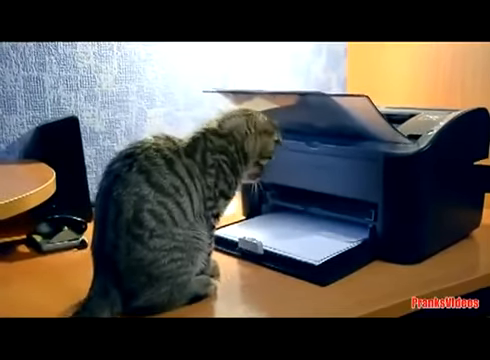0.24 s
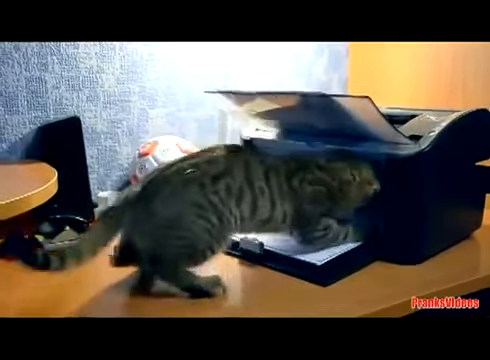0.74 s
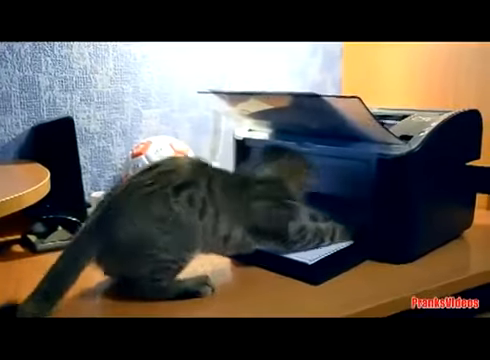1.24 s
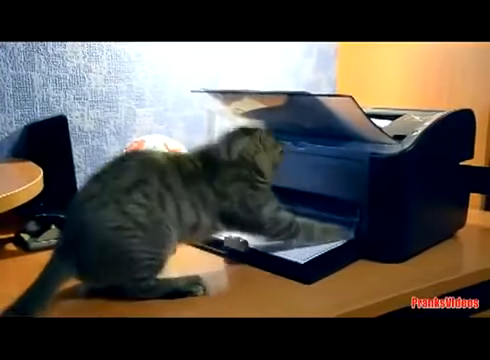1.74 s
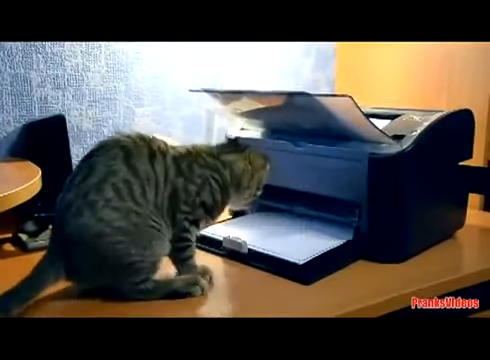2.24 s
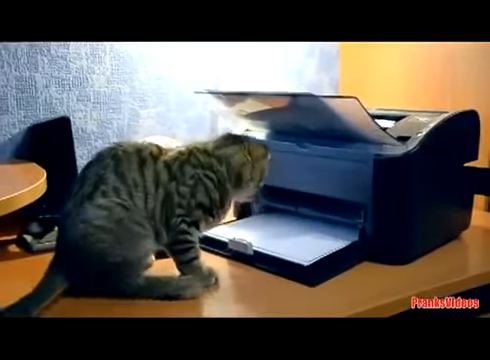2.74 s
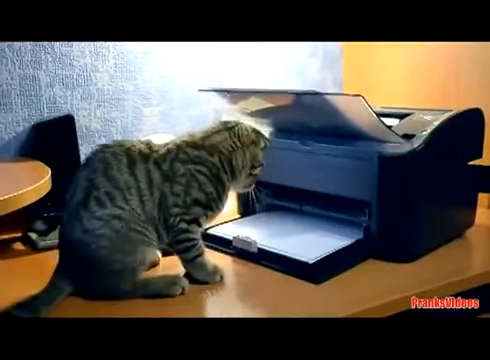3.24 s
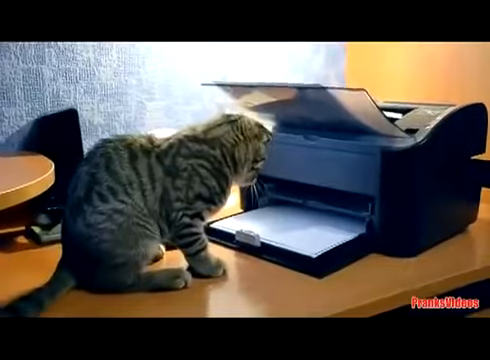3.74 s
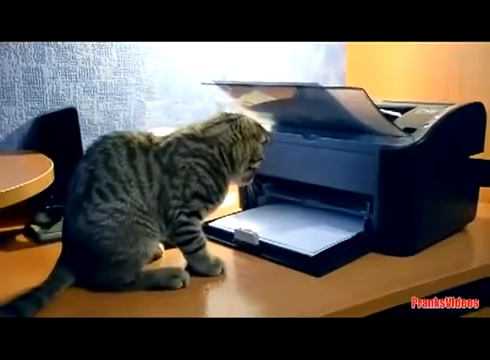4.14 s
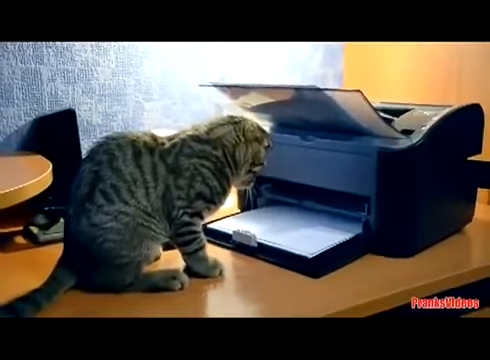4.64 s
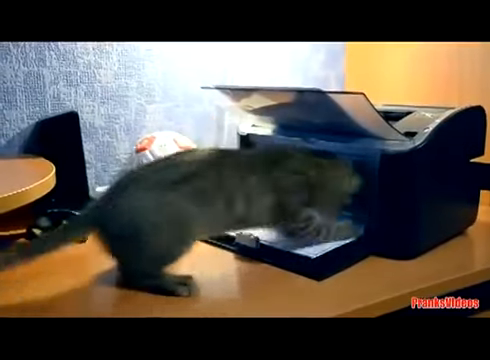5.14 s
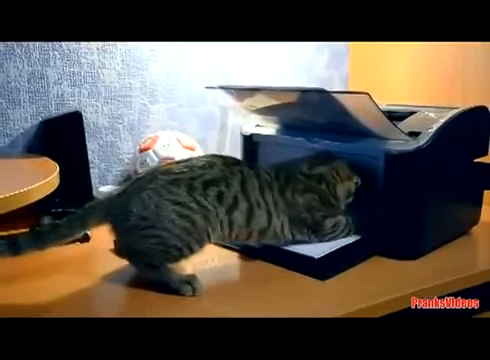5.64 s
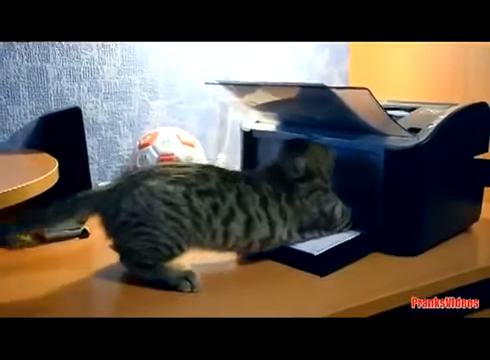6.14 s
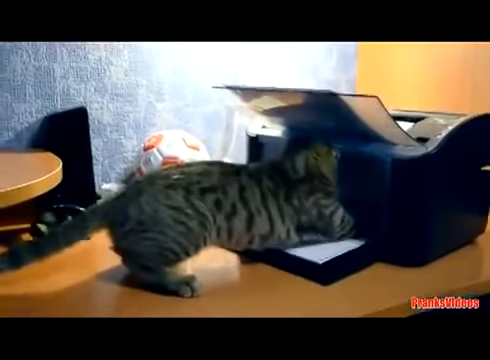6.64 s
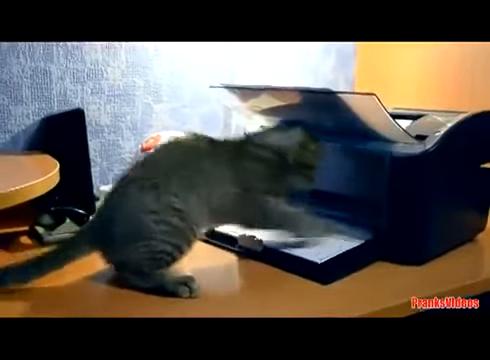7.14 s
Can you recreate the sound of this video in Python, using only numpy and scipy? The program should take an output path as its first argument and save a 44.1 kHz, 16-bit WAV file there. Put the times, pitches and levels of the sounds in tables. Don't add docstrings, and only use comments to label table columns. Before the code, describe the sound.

A small desktop printer hums and whirs steadily while irregular plastic clacks, paw thumps and sharp claw snaps rattle its tray in a furnished room.

```python
import sys
import numpy as np
from scipy import signal
from scipy.fft import rfft, irfft
from scipy.io import wavfile
from scipy.ndimage import uniform_filter1d

SR = 44100
rng = np.random.default_rng(int(sys.argv[2]) if len(sys.argv) > 2 else 0)


def transcribe(signal):
    frames = np.atleast_2d(signal).T
    limited = np.clip(frames, -1, 1)
    pcm = np.round(limited * 32767).astype(np.int16)
    wavfile.write(sys.argv[1], SR, pcm)


def boost(x):
    u = np.asarray(x, float) / 20
    return 10 ** u


N = 325458


def rms_one(x):
    return x / np.sqrt(np.mean(x ** 2) + 1e-20)


def in_time(rows):
    times, *columns = np.transpose(rows)
    return [np.interp(np.arange(N) / SR, times, column) for column in columns]


def at_hz(points, hz):
    point_hz, point_db = np.array(points)[:, :2].T
    return np.interp(np.log(hz), np.log(point_hz), point_db)


def drift(rate_hz):
    hop = 40
    r = np.exp(-2 * np.pi * hop * rate_hz / SR)
    slow = signal.lfilter([1], [1, -2 * r, r * r], rng.standard_normal(N // hop + 2002))[2000:]
    return np.interp(np.arange(N) / hop, np.arange(len(slow)), rms_one(slow))


def resonance(x, hz, width):
    r = np.exp(-np.pi * width / SR)
    poles = [1, -2 * r * np.cos(2 * np.pi * hz / SR), r * r]
    return signal.lfilter(np.array([1, 0, -1]) * (1 - r * r) / 2, poles, x)


def coloured_noise(spectrum, patchy_db, grain_db):
    hz = np.maximum(np.fft.rfftfreq(N, 1 / SR), 1)
    grains = rng.standard_normal(N) * boost(grain_db * rng.exponential(1, N))
    shaped = rfft(grains) * boost(at_hz(spectrum, hz))
    out = 0
    for octave in range(4, 15):
        share = np.clip(1 - np.abs(np.log2(hz) - octave), 0, 1)
        out = out + irfft(shaped * share, N) * boost(patchy_db * drift(19.4))
    return rms_one(out)


def room(x):
    t60_s, level_db, wall_cut_hz = 0.28, -4.5, 2600
    t = np.arange(SR // 3) / SR
    white = rng.standard_normal(len(t))
    dull = signal.sosfilt(signal.butter(1, wall_cut_hz, fs=SR, output="sos"), white)
    tail = dull * boost(-60 * t / t60_s) + (white - dull) * boost(-90 * t / t60_s)
    tail *= np.clip(t / 0.0041, 0, 1)
    wet = boost(level_db) * signal.fftconvolve(x, tail / np.sqrt(np.sum(tail ** 2)))
    return wet + np.pad(x, (0, len(t) - 1))


# (frequency [Hz], level per Hz [dB])
DRIVE_COLOUR = [(15, -81), (25, -60), (70, -58), (95, -43), (125, -20), (250, -14), (400, -11.5),
                (620, -10.5), (1000, -9.5), (1900, -8), (3000, -17.5), (5000, -36), (8000, -68)]
# (frequency [Hz], level per Hz [dB])
PAPER_COLOUR = [(1500, -27), (2500, -2), (3200, -4.5), (4000, -7), (5400, -9), (7000, -9), (9000, -11),
                (10300, -22.5), (11500, -18.5)]
# (frequency [Hz], width [Hz], level [dB])
CASE_PANELS = [(132, 23, -67.5), (306.7, 9.5, -65), (400, 4.2, -64.5), (854, 37, -59.5), (1065, 90, -56),
               (2110, 98, -59.5)]
# (time [s], level [dB])
DRIVE_LOAD = [(0, -40.5), (.18, -42), (.35, -46), (.78, -45.5), (.9, -40), (1.15, -43), (1.66, -41),
              (1.95, -44), (2.67, -42), (3.06, -43.5), (4.09, -43), (4.3, -43), (5.1, -42.5), (5.3, -49),
              (5.43, -42), (5.7, -44.5), (6.33, -42), (7.38, -40)]
# (middle time [s], half length [s], rise [dB])
PAPER_SLIDES = [(1.3, 0.27, -0.5), (2.4, 0.67, 2.5), (2.898, 0.26, 5.5), (3.55, 0.59, 3), (4.6, 0.73, 3),
                (5.42, .12, 4), (6.3, .4, 4), (6.913, .1, -0.5), (7.197, 0.31, 4.5), (1.05, 0.092, 4),
                (1.8, .1, -1)]


def running_noise():
    drive_db, = in_time(DRIVE_LOAD)
    t = np.arange(N) / SR
    paper_db = drive_db - 10
    for middle, half, rise_db in PAPER_SLIDES:
        paper_db = paper_db + rise_db * np.clip(1 - np.abs(t - middle) / half, 0, 1)
    drive = boost(drive_db - 4.0) * coloured_noise(DRIVE_COLOUR, patchy_db=2.0, grain_db=0.9)
    paper = boost(paper_db + 1.0) * coloured_noise(PAPER_COLOUR, patchy_db=0.74, grain_db=-2.0)
    panels = 0
    for hz, width, db in CASE_PANELS:
        panels = panels + boost(db) * rms_one(resonance(rng.standard_normal(N), hz, width))
    return drive + paper + panels


# (start time [s], end time [s], third multiple level [dB], sixth multiple level [dB])
CLEAR_PATHS = [(.2, 0.728, -62.5, -61), (.85, 1.5, -77, -69), (1.5, 2.2, -59.5, -65.5),
               (2.205, 3.62, -58, -59), (4.9, 5.35, -57, -58.5), (5.35, 6.05, -66, -69),
               (6.45, 6.8, -63, -63), (7.08, 7.45, -57, -58.5)]


def upper_path(column):
    screened_db, step_aside_s = -80, 0.041
    t = np.arange(N) / SR

    def opening(s):
        return np.clip((t - s) / step_aside_s + .5, 0, 1)

    level_db = screened_db
    for row in CLEAR_PATHS:
        is_open = opening(row[0]) - opening(row[1])
        level_db = level_db + (row[column] - screened_db) * is_open
    return level_db


# (time [s], pitch [Hz], level [dB])
GEAR_RUNS = [
    [(0.0, 502.6, -44), (7.38, 506.8, -43.5)],
]
# (multiple of its pitch [-], level [dB])
GEAR_TONES = [(1, 1), (2, -15.5), (4, -23)]
# (time [s], level [dB])
MIRROR_SECOND_TONE = [(0, -54), (.4, -52), (.75, -56), (1, -59), (1.3, -57.5), (1.9, -62), (2.35, -53),
                      (2.7, -60), (3, -50.5), (3.3, -49), (3.8, -52.5), (4.18, -48.5), (4.5, -52),
                      (5.4, -53.5), (6, -53.5), (7.38, -55)]


def motors():
    hz, level_db = in_time(GEAR_RUNS[0])
    turn = 2 * np.pi * np.cumsum(hz) / SR
    gear = sum(boost(level_db + db + 1.14 * drift(14)) * np.sin(k * turn) for k, db in GEAR_TONES)
    mirror_hz = 612.8
    turn = 2 * np.pi * mirror_hz * np.arange(N) / SR
    levels = [(2, in_time(MIRROR_SECOND_TONE)[0]), (3, upper_path(2)), (6, upper_path(3))]
    mirror = sum(boost(db + 2.0 * drift(27)) * np.sin(k * turn) for k, db in levels)
    return np.sqrt(2) * (gear + mirror)


# (time [s], frequency [Hz], peak level [dB], 60 dB decay time [s])
RINGING_PARTS = [(.103, 2270, -30, 0.16), (.103, 830, -34, 0.14), (1.92, 6350, -30.5, 0.11),
                 (1.92, 9030, -41, 0.19), (2.113, 9100, -57, 0.083), (2.945, 1230, -39, 0.11),
                 (3.441, 5800, -40, .2), (3.441, 1920, -31, 0.16), (3.441, 10000, -44, .12),
                 (3.96, 476, -27, 0.13), (4.085, 6370, -37, 0.079), (4.181, 9300, -45, 0.072),
                 (4.567, 1440, -33, .06), (4.915, 2250, -33, .15), (4.915, 6970, -33, 0.055),
                 (5.045, 2120, -28.5, 0.15), (5.76, 800, -37.5, 0.21), (6.8, 870, -28.5, 0.12),
                 (6.772, 5140, -43, 0.3), (6.796, 5900, -39, 0.13), (6.796, 4500, -37.5, .12),
                 (6.797, 7200, -44, 0.19), (6.801, 151, -42, 0.21), (.74, 3200, -47, 0.18),
                 (.96, 3040, -51, 1.1), (3.952, 2700, -37, .13), (6.346, 4030, -34.5, 0.07),
                 (4.075, 2200, -28, 0.15), (.258, 2090, -30, 0.14), (5.042, 1150, -24, 0.12)]


def rings():
    out, t = np.zeros(N + SR), np.arange(SR // 4) / SR
    swell = 1 - np.exp(-t / 0.0021)
    for s, hz, peak_db, t60 in RINGING_PARTS:
        shaken = rms_one(resonance(rng.standard_normal(len(t)), hz, 40 + 0.01 * hz))
        start = round(s * SR)
        out[start:start + len(t)] += shaken * boost(peak_db - 60 * t / t60) * swell
    return out[:N]


# (time [s], peak level [dB])
CLAW_SNAPS = [
    (.836, -27),
    (1.647, -27.5),
    (4.916, -33),
    (6.738, -27),
    (6.771, -17.5),
    (6.794, -7.5),
    (6.801, -20),
    (6.811, -38),
    (6.83, -29),
]
# (frequency [Hz], width [Hz], level [dB])
TRAY_MODES = [(390, 99, -31), (900, 67, 1), (1480, 570, 15), (2240, 300, 14), (4600, 1400, 5.5),
              (5720, 380, 11.5), (7140, 440, -12)]


def snaps():
    clicks = np.full(N, 1e-18)
    for s, peak_db in CLAW_SNAPS:
        clicks[round(s * SR) + np.arange(2)] = boost(peak_db + 1.5)
    clicks = signal.sosfilt(signal.butter(4, 7600, fs=SR, output="sos"), clicks)
    tray = 0
    for k, (hz, width, db) in enumerate(TRAY_MODES):
        tray = tray + (-1) ** k * boost(db) * resonance(clicks, hz, width)
    return tray


# (time [s], peak level [dB], snap below peak [dB],
# second landing above the first [dB], rattle 60 dB decay time [s])
LEVER_LANDINGS = [(.254, -17, -24, -7.5, .13), (.753, -22.5, -29, -7.5, 0.24), (.812, -29.5, -22, 4, 0.081),
                  (1.916, -18, -13, -2.5, 0.073), (2.942, -22.5, -9.5, -16, .07),
                  (3.299, -31, -13, 1.5, 0.092), (3.948, -16.5, -29, -3.5, 0.099),
                  (4.157, -33, -13.5, 9.5, 0.11), (4.632, -28.5, -15, 0, .12),
                  (5.039, -17.5, -21.5, -5, .155), (5.252, -27.5, -12.5, 6, .2),
                  (6.176, -22.5, -16, 1, 0.055), (6.342, -15, -21.5, -5.5, 0.1),
                  (6.884, -27.5, -16.5, 0, 0.091)]
# (time [s], peak level [dB], snap [dB], second landing [dB], rattle decay time [s])
LIGHT_CATCHES = [
    (3.032, -21.5, -16.5, -4.5, 0.098),
    (4.067, -19, -23, 2, 0.17),
    (4.905, -25.5, -16.5, 0, 0.21),
    (5.46, -26.5, -12.5, -2, 0.24),
]
# (time [s], peak level [dB], thud below peak [dB], snap below peak [dB], rattle decay time [s])
PAW_BLOWS = [(.221, -32, -10, -32, .34), (.279, -26, -9, -19, 0.11), (.735, -19, -13, -3, 0.24),
             (0.998, -35.5, 1, -10, 0.31), (1.916, -24.5, -8, -22, 0.14), (4.743, -25.5, -18.5, -23, 0.076),
             (5.039, -26, -8, -19, .15), (6.069, -35, -14, -17, 0.23), (6.735, -25, -10.5, -28, .12),
             (6.771, -20.5, -12, -22, 0.1), (6.794, -23, -17, -32, .08), (6.816, -27.5, -8, -25, .053)]
# (time [s], peak level [dB], thud below peak [dB], snap below peak [dB], rattle decay time [s])
SMALL_TICKS = [(.1, -24, -27, -14.5, 0.2), (.138, -29.5, -13, -21, 0.15), (.181, -33, -19, 6, 0.038),
               (.789, -29, -18, -10, .25), (1.366, -38, -31, -3, .07), (1.645, -25, -18, -16, 0.09),
               (1.8, -41, -17, 2, 0.16), (2.016, -27, -25, -25, .063), (2.111, -22, -22, -11, 0.032),
               (2.272, -33.5, -20, -19, .1), (3.439, -22.5, -34, -3, 0.087), (3.855, -31, -20, -16, .07),
               (3.995, -22.5, -28, -44, .1), (4.514, -32.5, -33, -21, .16), (4.566, -30.5, -20, -23, 0.44),
               (4.678, -29, -28, -11, 0.1), (5.33, -30, -13, -17.5, 0.36), (5.518, -27, -17, -17, 0.075),
               (5.755, -25, -17, -32, 0.072), (6.149, -30, -19, -18, 0.23),
               (6.245, -25.5, -19.5, -24, 0.03), (6.314, -34, -18, 1, 0.042),
               (6.468, -28.5, -23, -17.5, 0.094)]


def landings():
    thud_db = -22.5
    pairs = [(.02, *row) for row in LEVER_LANDINGS] + [(.012, *row) for row in LIGHT_CATCHES]
    doubles = []
    for gap_s, s, db, snap_db, more_db, t60 in pairs:
        doubles.append((s, db, thud_db, snap_db, t60))
        doubles.append((s + gap_s, db + more_db, thud_db + 2.5, snap_db - 2, 1.2 * t60))
    return doubles + list(PAW_BLOWS) + list(SMALL_TICKS)


# (frequency [Hz], level [dB])
HOUSING_COLOUR = [(120, -9.5), (250, 0), (400, 5), (650, -2.5), (1000, 2.5), (1500, 3.5), (2100, 4),
                  (2700, 2.5), (3400, 1), (4300, 1), (5200, -0.5), (6200, 2.5), (9200, -3.5), (11000, -22)]


def knocks():
    out, t = np.zeros(N + SR), np.arange(SR // 4) / SR
    swell = 1 - np.exp(-t / .0013)
    modes = np.geomspace(130, 10500, 30)
    for s, peak_db, thud_db, snap_db, t60 in landings():
        clack_db = -6 + 0.21 * snap_db

        sizes = rng.standard_normal(len(t)) * boost(2.0 * np.minimum(rng.exponential(1, len(t)), 3.5))
        fall_db = -60 * t / t60
        contacts = sizes * (rng.random(len(t)) < 7000 / SR) * boost(fall_db) * swell
        contacts[SR // 1000] += 1.4
        hard = contacts * boost(0.22 * fall_db)

        pitches = modes * boost(rng.normal(0, .1, len(modes)))
        share_db = np.interp(np.log(pitches), np.log([400, 800, 1300, 2400, 5500, 10000]),
                             [thud_db + 12, 0, 0, clack_db + 8, snap_db + 11.5, 1.16 * snap_db + 14.5])
        uneven_db = rng.normal(0, 1.2, len(modes))
        strength = boost(share_db + at_hz(HOUSING_COLOUR, pitches) + uneven_db)
        widths = 30 + .14 * pitches
        body = 0
        for k, (gain, hz, width) in enumerate(zip(strength, pitches, widths)):
            push = hard if hz > 3500 else contacts
            body = body + (-1) ** k * gain * resonance(push + 1e-18, hz, width) / np.sqrt(width)

        loudest = np.sqrt(uniform_filter1d(body ** 2, size=SR // 100).max())
        heard = room(boost(peak_db - 10) * body / loudest)
        start = round(s * SR)
        out[start:start + len(heard)] += heard
    return out[:N]


def scene():
    hits = knocks() + rings() + room(snaps())[:N]
    thin = signal.sosfilt(signal.butter(2, 110, "high", fs=SR, output="sos"), hits)
    return (running_noise() + motors() + thin)[None]


def drop_weak_treble(x):
    weak_hz, weak_db = 10800, -110
    hz, _, z = signal.stft(x, SR, nperseg=2048)
    strong = uniform_filter1d(np.abs(z) ** 2, size=6, axis=-2) > boost(weak_db) ** 2
    keep = strong | (hz < weak_hz)[:, None]
    return signal.istft(z * keep, SR, nperseg=2048)[1][..., :N]


def roll_off(x):
    return signal.sosfilt(signal.butter(12, 14840, fs=SR, output="sos"), x)


def record(dry):
    heard = dry - 0.61 * resonance(dry, 7940, 710)
    kept = signal.sosfilt(signal.cheby2(14, 60, 11800, fs=SR, output="sos"), heard)
    mirrored = kept * (-1.) ** np.arange(N)
    image = signal.sosfilt(signal.butter(3, [13100, 14250], "band", fs=SR, output="sos"), mirrored)
    mix = drop_weak_treble(kept + boost(-24.0) * image)
    return roll_off(mix)


dry = scene()
out = record(dry)
transcribe(out)
```